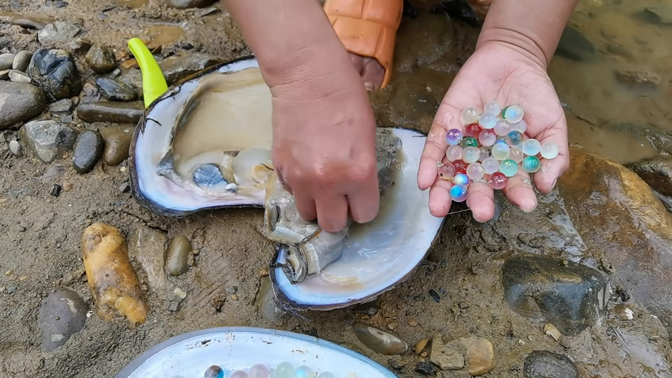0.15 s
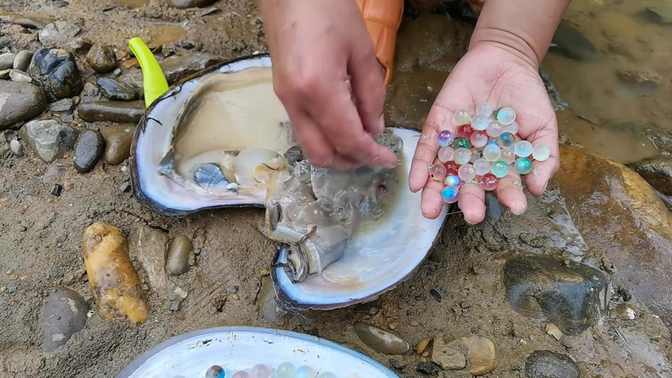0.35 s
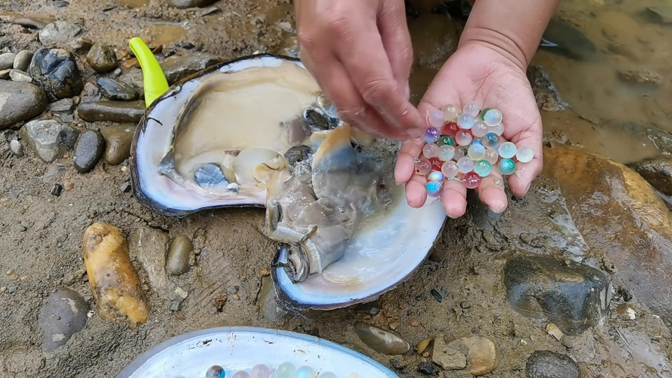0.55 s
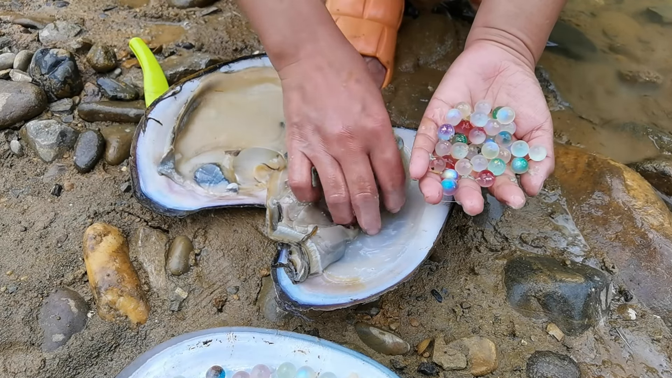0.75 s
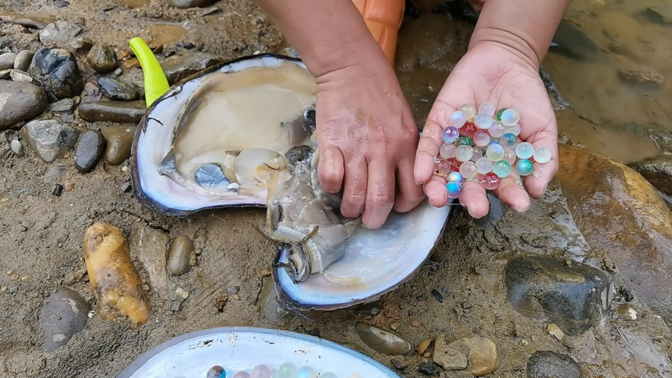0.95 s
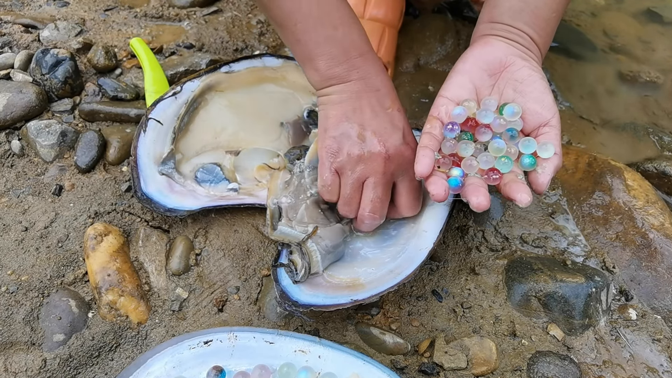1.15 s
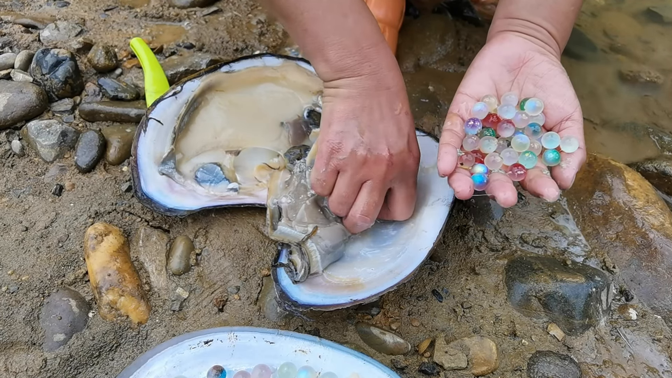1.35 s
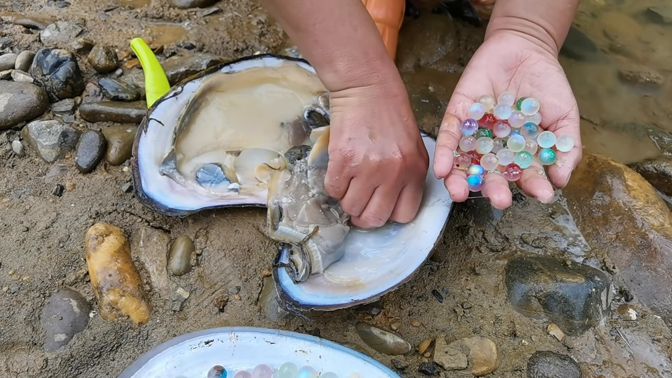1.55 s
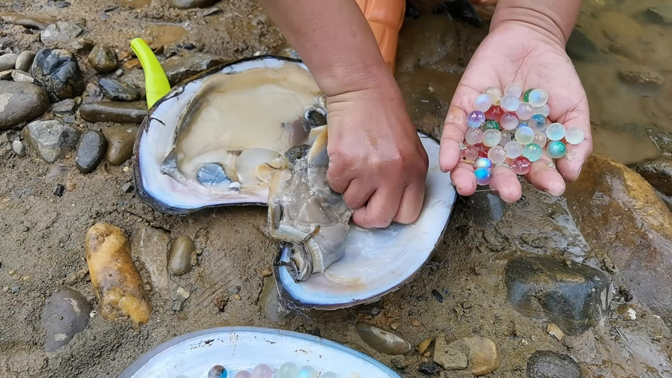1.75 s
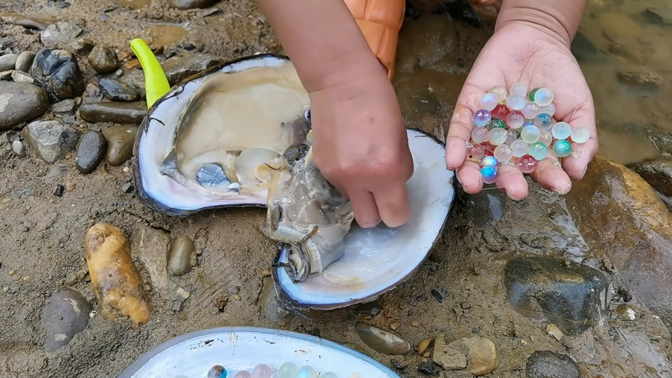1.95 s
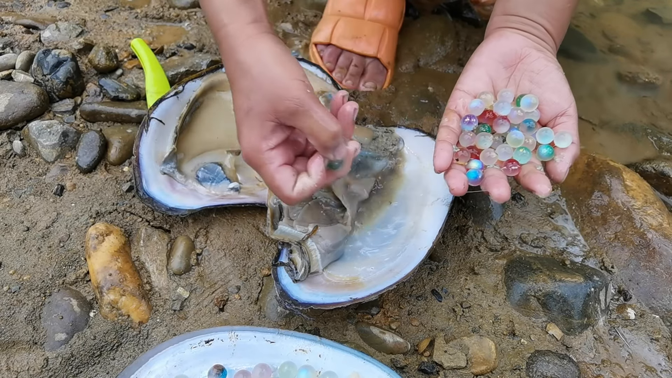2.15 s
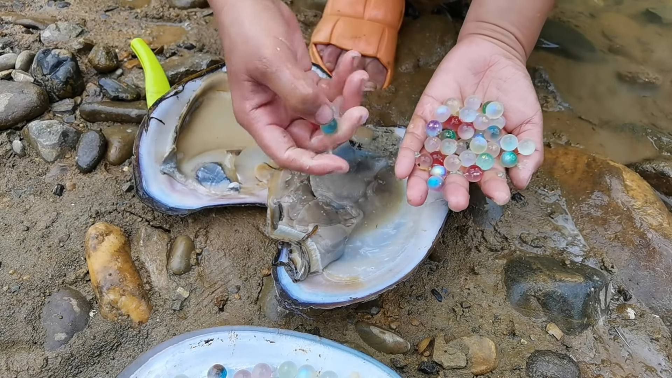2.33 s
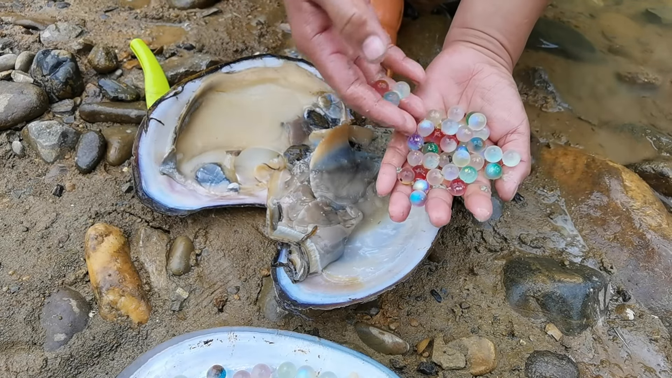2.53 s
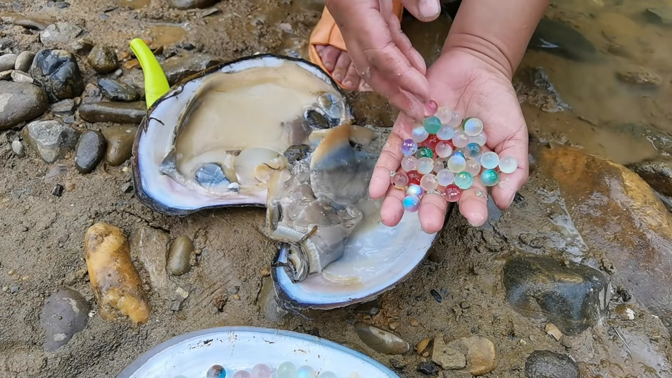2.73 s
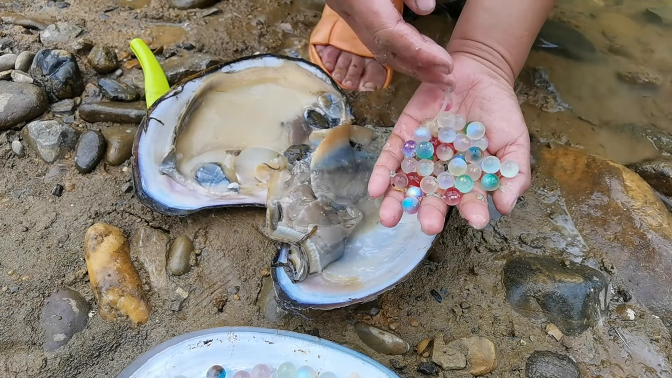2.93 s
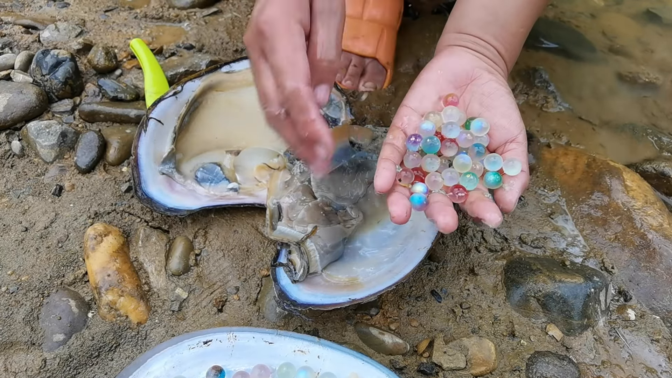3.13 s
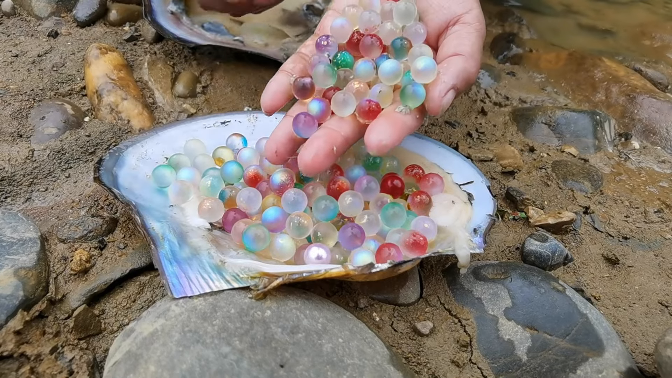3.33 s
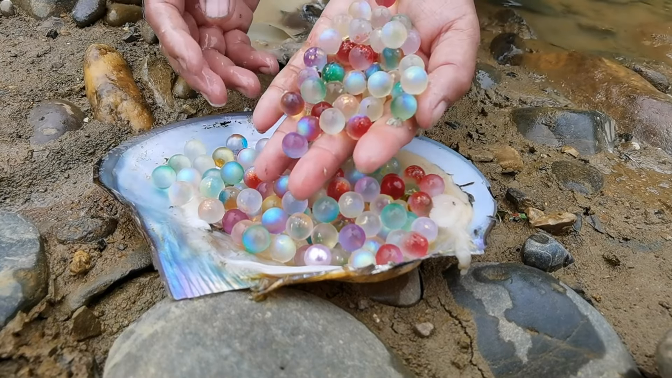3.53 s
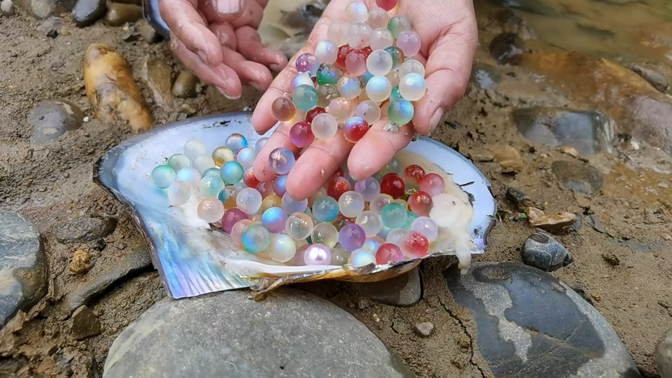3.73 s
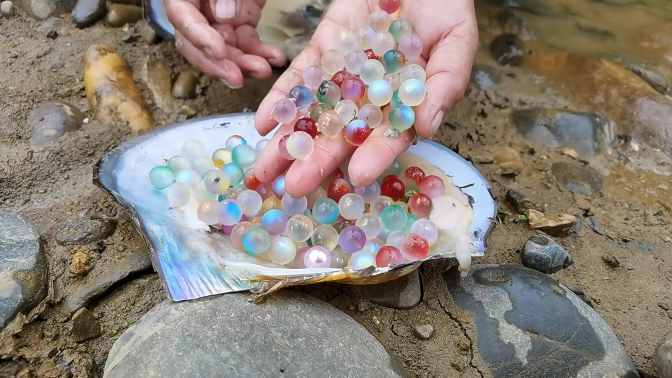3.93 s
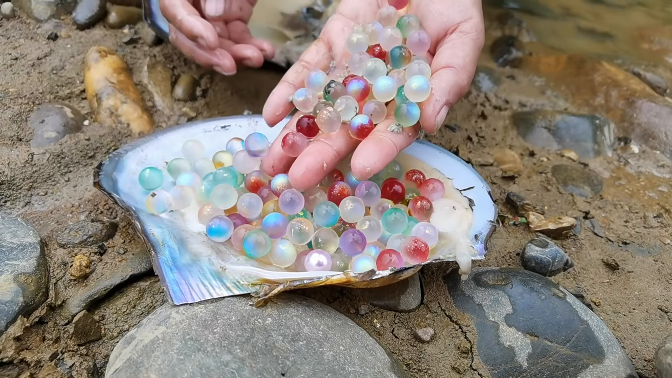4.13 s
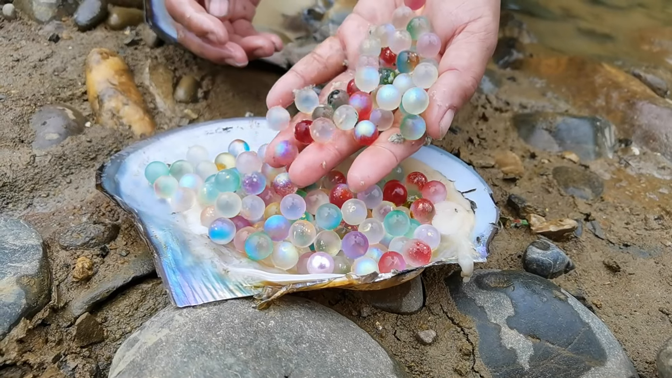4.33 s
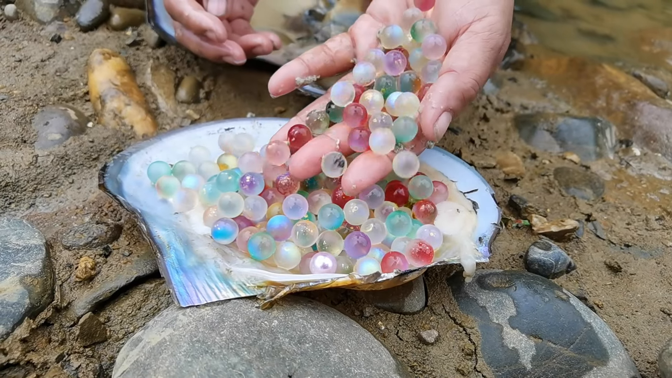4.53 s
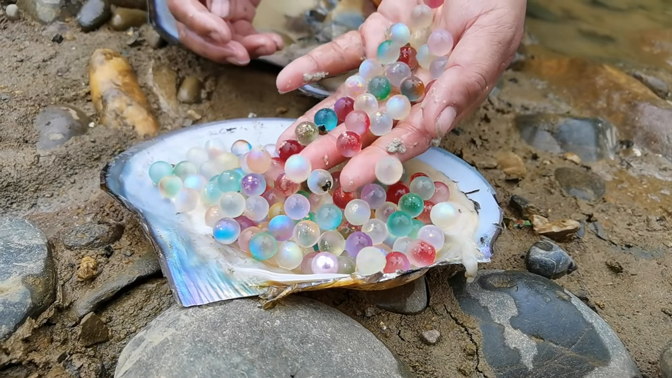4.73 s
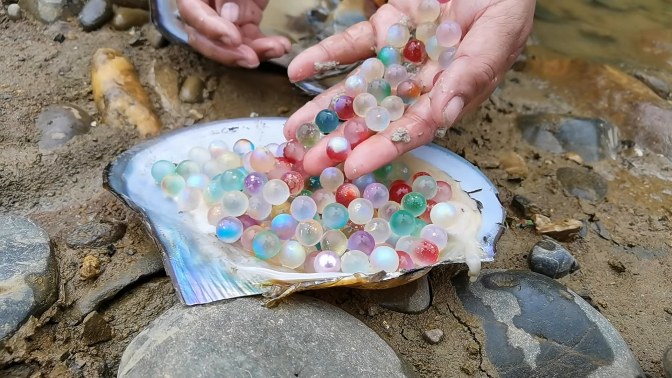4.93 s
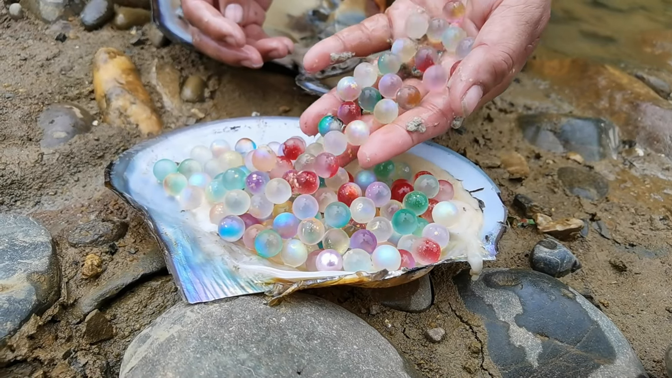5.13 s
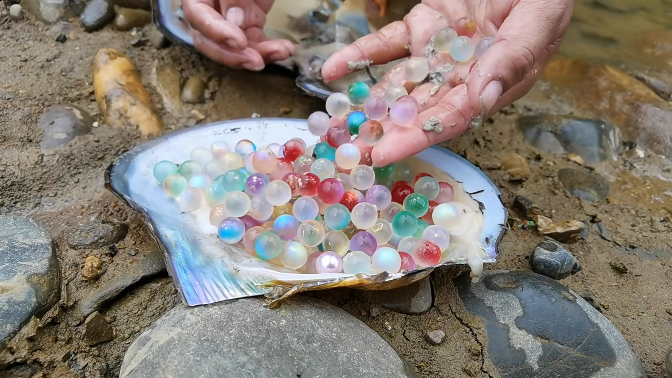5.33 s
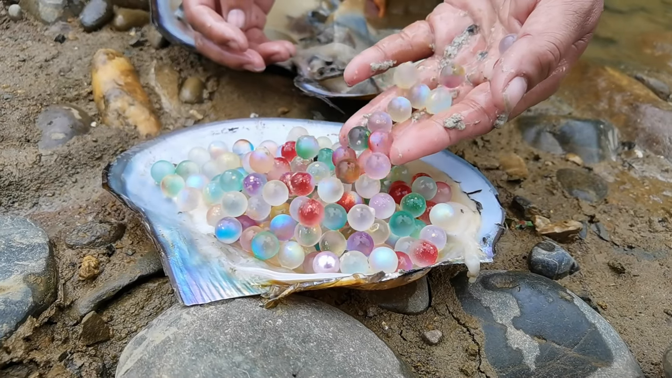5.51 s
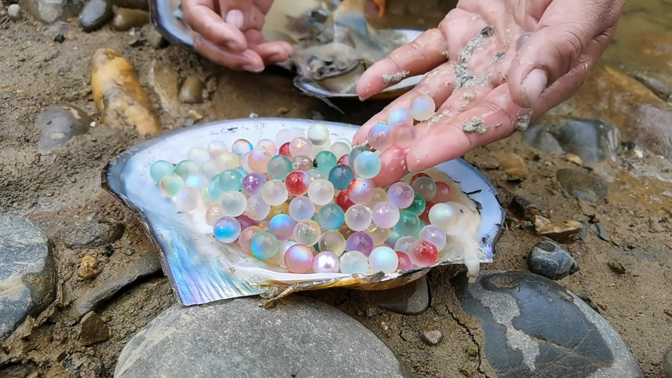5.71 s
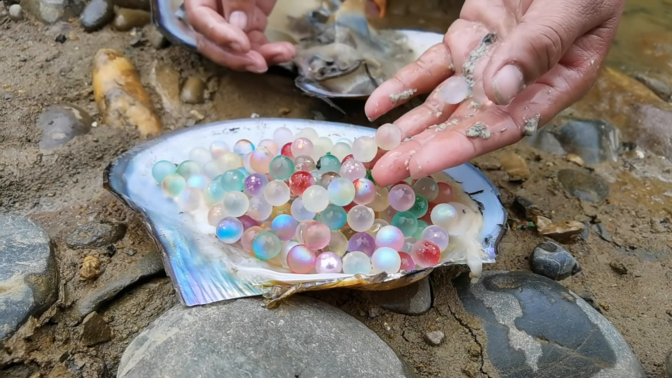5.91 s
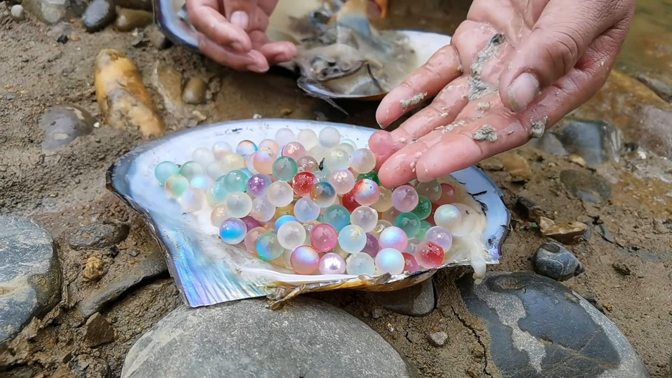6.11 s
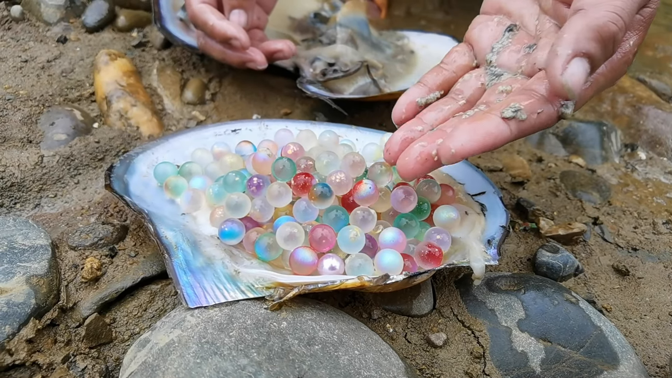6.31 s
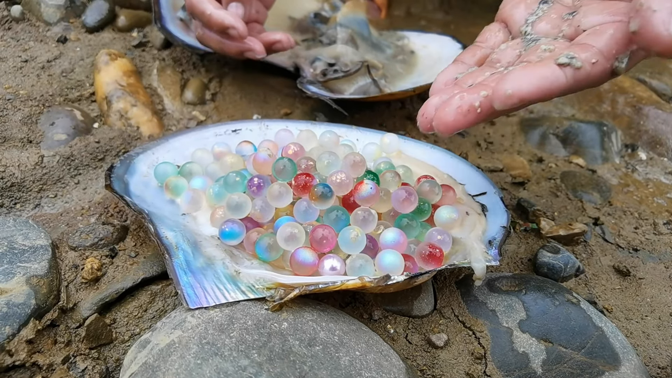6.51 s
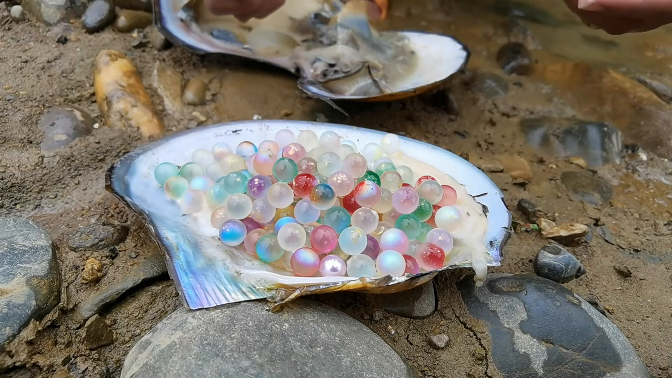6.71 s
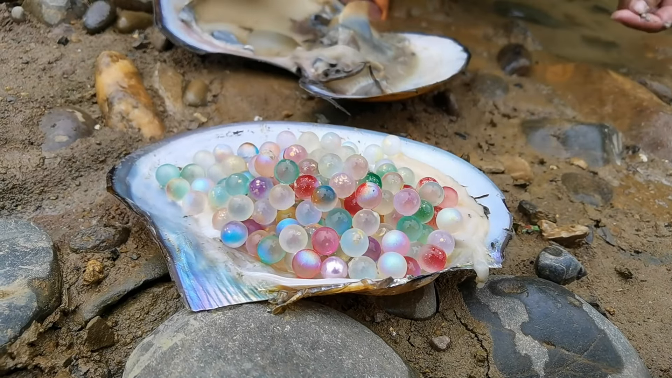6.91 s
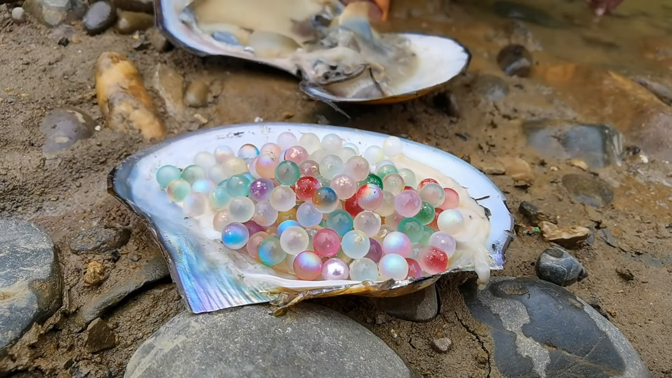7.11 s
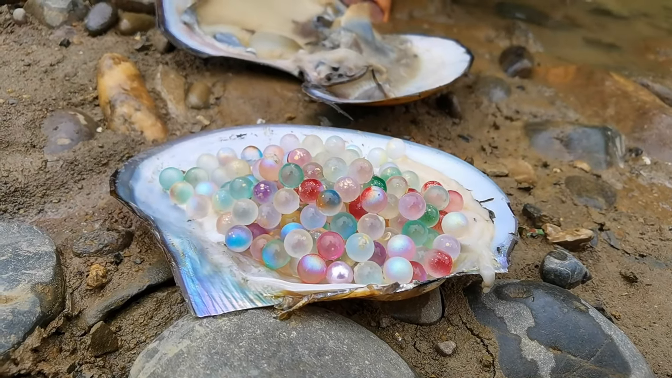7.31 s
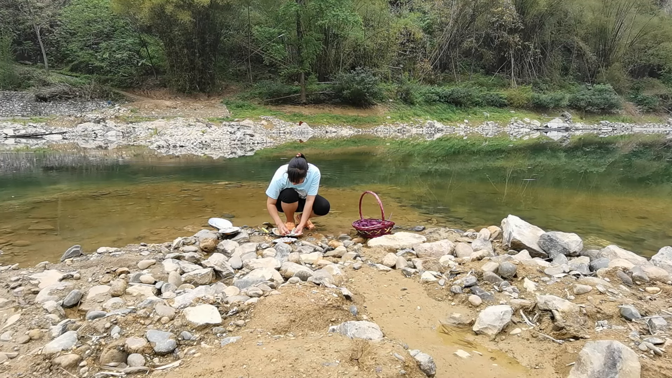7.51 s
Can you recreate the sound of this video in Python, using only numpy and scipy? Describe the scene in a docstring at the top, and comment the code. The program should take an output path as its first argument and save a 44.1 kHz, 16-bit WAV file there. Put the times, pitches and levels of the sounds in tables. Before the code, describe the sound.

Isolated bead clicks and bright little bounces, soft wet finger rubbing and distant bird whistles, then a dense close clatter of beads that thins and stops.

```python
"""On a river bank a hand digs glass beads out of a wet mussel and drops them on a handful,
then lets the handful roll off the fingers onto a heap of beads in a large shell, close by on the right.
Birds whistle in the trees across the water; the river murmurs faintly."""
import sys
import numpy as np
from scipy import signal
from scipy.fft import rfft, irfft
from scipy.io import wavfile

SR = 44100
rng = np.random.default_rng(int(sys.argv[2]) if len(sys.argv) > 2 else 0)


def inscribe(sig):
    """Save sig as 16-bit PCM at rate SR to the path in sys.argv[1].

    A 1-D sig is mono; a 2-D sig holds one channel per row.
    Samples are clipped to [-1, 1] before scaling.
    """
    pcm = np.round(np.clip(np.atleast_2d(sig).T, -1, 1) * 32767)
    wavfile.write(sys.argv[1], SR, pcm.astype(np.int16))


N = 333396

# loud bead strikes: (s, level dB, treble over middle dB)
CLICKS = [(0.124, -14, -6), (0.6437, -44, -13), (0.9026, -15, -3), (1.2918, -18, 4), (1.571, -23, -1),
          (1.9077, -27, -4), (1.9655, -16, -10), (2.2078, -24, 15), (2.2344, -22, -1), (2.272, -22, 3),
          (2.3795, -30, 3), (2.3942, -24, 17), (2.5507, -12, 15), (3.0391, -18, 9), (3.5177, -17, -4),
          (3.5921, -15, 12), (3.6771, -9, 15), (3.7284, -22, 14), (3.8332, -11, -4), (3.8673, -8, -4),
          (3.914, -8, -8), (3.9527, -7, -4), (4.0008, -11, -1), (4.0175, -9, -1), (4.0588, -11, -6),
          (4.0802, -9, -3), (4.1173, -8, 2), (4.1337, -9, -2), (4.2016, -11, -4), (4.2397, -14, -9),
          (4.3238, -12, -3), (4.4089, -11, -6), (4.4629, -11, -8), (4.4932, -8, -14), (4.5651, -8, 5),
          (4.5767, -8, -10), (4.6308, -9, 0), (4.6494, -10, -4), (4.7076, -11, 0), (4.7449, -10, -1),
          (4.7824, -11, -7), (4.8191, -13, -1), (4.8366, -8, -1), (4.9068, -10, 3), (4.9522, -17, -3),
          (5.0071, -21, -3), (5.0991, -25, 3), (5.1338, -11, -2), (5.157, -11, -6), (5.3145, -16, 0),
          (5.3701, -13, -3), (5.4143, -12, -6), (5.4578, -13, 2), (5.5032, -10, -5), (5.519, -10, -6),
          (5.638, -16, 0), (5.6668, -12, 5), (5.6906, -10, -4), (5.7216, -9, -8), (5.7753, -10, 3),
          (5.8277, -10, 0), (5.8537, -11, -7), (5.8696, -8, -9), (5.9093, -11, -1), (5.9586, -13, -4),
          (6.0365, -14, -8), (6.0895, -12, -3), (6.1443, -10, 0), (6.2105, -10, -7), (6.3019, -22, 1),
          (6.4531, -12, 7), (6.5514, -18, -5), (7.2237, -50, -8), (7.4052, -41, -21)]   # fixed
# ring of beads and shell: (Hz, width Hz, left dB, right dB)
MODES_HZ = [(1484, 72, -25.5, -3), (2552, 1290, -2, 2), (3272, 1400, -8, 11), (3805, 332, 2.5, 19.5), (5560, 340, -10.5, 8),
            (6600, 5000, -4, -37.5), (9360, 880, -32, 10), (10720, 1230, -27, 8), (12200, 10400, -15.5, -4.5)]
# heavy knocks that rock the shell on the ground: (s, level dB)
KNOCKS = [(4.134, -39), (4.708, -48), (5.519, -36), (6.211, -40), (7.412, -53)]   # fixed
# fingers rubbing in the wet flesh: (start s, length s, level dB)
RUBS = [(0.705, 0.082, -53), (0.829, 0.23, -53), (1.103, 0.15, -57), (1.219, 0.28, -52.5), (1.546, 0.082, -42), (1.658, 0.12, -46), (3.203, 0.11, -50), (3.447, 0.13, -51.5), (7.214, 0.22, -69.5)]
# background: (s, river murmur dB, high hiss dB)
AMBIENCE = [(0, -60.5, -68.5), (1.2, -60, -64), (3.1, -62, -64), (3.65, -63.5, -54), (3.8, -77.5, -68), (6.82, -82.5, -82), (6.88, -82.5, -73),
            (7.39, -73, -72), (7.43, -65, -73)]
# low rumble: (s, level dB)
RUMBLE = [(0, -76), (3.18, -79.5), (3.23, -47.5), (3.56, -53), (3.7, -75), (7.5, -84)]
# spectra: (Hz, dB per Hz)
MURMUR = [(50, -1), (130, -2.5), (215, 2.5), (300, -8.5), (650, -9.5), (1400, -20.5), (3000, -39.5)]
HISS = [(900, -11), (2300, -1), (3700, 4), (5200, -9), (10000, -8), (15000, -11.5)]
# how long neighbouring beads shiver after a strike (s)
SHIVER_S = .003   # fixed
CUTOFF_HZ = 16000   # fixed
TIME = np.arange(N) / SR
MS = SR // 1000   # fixed
VALLEY_T60_S = .6   # fixed
# on the heap a bead lands once more after each strike: usual delay (s), loss (dB)
REBOUND_S, REBOUND_LOSS_DB = .011, 11
# beads dropped on the handful bounce to rest: (s, level dB, touches, s between touches)
BOUNCES = [(0.4003, -11, 3, .034), (2.5664, -10, 3, .0062), (2.6154, -11, 2, .027), (2.7239, -13, 3, .0265), (2.8081, -22, 2, .039)]   # fixed
# loss from one touch to the next (dB); treble over middle of glass on glass (dB)
BOUNCE_LOSS_DB, GLASS_TREBLE_DB = 5.5, 15
# the pour lasts from, to (s)
POUR_S = (3.82, 6.41)   # fixed
# the handful rolls off in surges: (start s, length s, level dB)
SURGES = [(3.825, 0.33, -21), (4.193, 0.166, -26), (4.398, 0.57, -22), (5.124, 0.086, -24), (5.308, 0.86, -24)]   # fixed
# a surge builds up and dies away (s); jostling relative to its surge, and the trickle between surges (dB)
SURGE_ATTACK_S, SURGE_RELEASE_S, JOSTLE_DB, TRICKLE_DB = 0.026, 0.027, -12, -48
# a strike stirs the heap for a while (s); share of that stirring which the jostling follows
STIR_S, STIR_FOLLOWS = 0.032, 0.37
# thud under an ordinary strike of full scale (dB); it grows with the square of the force
THUD_DB = -37
# the notes of each bird call: (delay s, length s, first Hz, last Hz, level dB)
BIRD_CALLS = {"rising whistle": [(0, .21, 3930, 5200, -0.5)],
              "upward flick": [(0, 0.045, 4750, 6450, -2)],
              "high slur": [(0, .16, 6320, 5820, 0)],
              "low chirp": [(0.0095, 0.022, 2560, 2280, 0)],
              "low whistle": [(0, 0.095, 1570, 1400, -3)],
              "two-note call": [(0, 0.065, 3277, 2926, -17), (.052, .06, 3930, 3567, -1)]}
# birds calling: (s, call, level dB)
SONG = [(0.041, "rising whistle", -54.5), (.805, "high slur", -60), (1.031, "upward flick", -55.5), (1.786, "rising whistle", -59.5),
        (1.864, "low chirp", -57), (2.068, "low chirp", -62), (2.16, "low chirp", -55.5), (2.398, "two-note call", -36),
        (2.679, "low chirp", -61), (2.92, "low chirp", -58.5), (3.043, "rising whistle", -64.5), (3.135, "upward flick", -60),
        (3.365, "rising whistle", -51), (6.451, "two-note call", -52), (6.645, "upward flick", -70.5), (6.98, "low whistle", -76.5)]
# the heap falls quiet while a bead is in the air, just ahead of each strike (s)
LULL_S = .015   # fixed
# each dropped bead nudges its neighbours into a few faint ticks: within (s), loss (dB)
NUDGE_S, NUDGE_LOSS_DB = .05, 13


def from_db(db):
    """Decibels to gain."""
    return 10 ** (np.asarray(db) / 20)


def rms_one(x):
    """Scale to rms 1."""
    return x / np.sqrt(np.mean(x ** 2) + 1e-20)


def unit_energy(x):
    """Scale each stereo burst to the energy of one millisecond at rms 1."""
    return x * np.sqrt(2 * MS / np.sum(x ** 2, axis=(-2, -1), keepdims=True))


def in_time(rows):
    """The columns of a curve at every sample."""
    s, *columns = np.transpose(rows)
    return [np.interp(TIME, s, c) for c in columns]


def band(x, hz, kind, order=2):
    """Butterworth filter."""
    return signal.sosfilt(signal.butter(order, hz, kind, fs=SR, output="sos"), x)


def resonate(x, hz, width_hz):
    """A resonance with gain 1 on top."""
    r = np.exp(-np.pi * width_hz / SR)
    return signal.lfilter(np.array([1, 0, -1]) * (1 - r * r) / 2, [1, -2 * r * np.cos(2 * np.pi * hz / SR), r * r], x + 1e-18)


def add(out, s, sound):
    """Mix a sound in at time s."""
    i = max(round(s * SR), 0)
    out[..., i:i + sound.shape[-1]] += sound[..., :max(N - i, 0)]


def coloured(spectrum, left_db, alike_below_hz):
    """Stereo noise of a given spectrum, alike in both ears in the bass."""
    hz = np.fft.rfftfreq(N, 1 / SR) + 1
    points, db = np.transpose(spectrum)
    white = rfft(rng.standard_normal((3, N)))
    own = np.sqrt(hz ** 2 / (hz ** 2 + alike_below_hz ** 2))
    both = own * white[:2] + np.sqrt(1 - own ** 2) * white[2]
    return rms_one(irfft(both * from_db(np.interp(np.log(hz), np.log(points), db)), N) * from_db([[left_db], [0]]))


def shell(force, size=1, low_cut_hz=1150):
    """Contact force rings the modes, each with its own strength at either ear; small bodies radiate no bass."""
    rings = sum((-1) ** k * resonate(force, hz / size, width) * from_db([[left], [right]]) for k, (hz, width, left, right) in enumerate(MODES_HZ))
    return band(rings, low_cut_hz, "high")


def strikes(crack_s=0.00011, ring_db=-14, pitch_spread=0.081, level_db=0.22):
    """Each strike is a hard crack followed by a brief shiver of the neighbouring beads; no two ring quite alike."""
    t = np.arange(1024) / SR   # fixed
    blow = (1 - np.exp(-t / crack_s)) * (np.exp(-t / (2 * crack_s)) + from_db(ring_db) * np.exp(-t / SHIVER_S))
    hits = touches()
    force = at_both_ears((len(hits), 2, len(t))) * blow
    sizes = np.exp(pitch_spread * rng.standard_normal(len(hits)))
    rings = np.array([shell(f, size) for f, size in zip(force, sizes)])
    middle, treble = (unit_energy(band(rings, 6500, kind, order=8)) for kind in ("low", "high"))   # fixed
    out = np.zeros((2, N))
    for (s, db, bright_db), low, high in zip(hits, middle, treble):
        bright = from_db(bright_db)   # glass on glass is bright, glass on shell duller
        add(out, s, from_db(db + level_db) * (low + bright * high) / np.hypot(1, bright))
    return out


def grains(per_s, spread_db):
    """Random tiny contacts of uneven size."""
    return (rng.random(N) < per_s / SR) * rng.choice([-1, 1], N) * from_db(spread_db * rng.uniform(-1, 1, N))   # fixed


def jostle(settle_s=0.0013, busy_per_s=135):   # fixed
    """Beads of three sizes nudge each other between the louder strikes: the faster they flow, the more and harder the contacts."""
    level_curve_db = agitation()
    flow = from_db((level_curve_db - level_curve_db.max()) / 3)   # fixed
    # a bead falls freely for a moment before it lands, so a short lull comes ahead of each strike
    landings = np.append(np.array(CLICKS)[:, 0], N / SR)
    until_landing = landings[np.searchsorted(landings, TIME)] - TIME
    lull = 1 - np.exp(-(until_landing / LULL_S) ** 4)   # fixed
    out = 0
    for size in (.91, 1, 1.1):   # fixed
        contacts = grains(per_s=busy_per_s * flow, spread_db=10) * lull   # fixed
        shiver = np.sqrt(signal.lfilter([1], [1, -np.exp(-2 / (settle_s * SR))], contacts ** 2 + 1e-18))
        out = out + shell(shiver * at_both_ears((2, N)), size)
    pouring = (TIME > POUR_S[0]) & (TIME < POUR_S[1])
    return from_db(level_curve_db) * rms_one(out) * pouring


def knocks(top_hz=750, level_db=5):
    """The shell gives a dull, quickly damped thud against the mud."""
    t, out = np.arange(SR // 10) / SR, np.zeros((2, N))
    damping = np.exp(-t / .0045)   # fixed
    for s, db in KNOCKS + [(s, THUD_DB + 2 * db) for s, db, _ in CLICKS]:
        thud = band(rng.standard_normal(len(t)) * damping, top_hz, "low", order=1) * from_db([[-6], [0]])
        add(out, s, from_db(db + level_db) * unit_energy(thud))
    return out


def rubbing(uneven_db=3):
    """Wet fingers stick and slip inside the mussel: a fine, soft crackle that comes in uneven spurts."""
    pressure = np.zeros(N)
    for s, length, db in RUBS:
        add(pressure, s, from_db(db) * signal.windows.tukey(int(length * SR), .5))
    slips = grains(per_s=1400, spread_db=7) * from_db(uneven_db * flutter(35))   # fixed
    scrape = shell(slips)
    squelch = band(slips * at_both_ears((2, N)), [1100, 3200], "band") + resonate(slips, 1270, 110)   # soft flesh rings low and broad
    return pressure * (rms_one(scrape) + rms_one(squelch)) / 2


def birds(waver=0.01, tremble_db=3):
    """Slightly husky whistles that glide between two pitches."""
    out, wobble, tremble = np.zeros(N), 1 + waver * flutter(160), tremble_db * flutter(110)
    notes = [(s + delay, length, first_hz, last_hz, db + note_db)
             for s, call, db in SONG for delay, length, first_hz, last_hz, note_db in BIRD_CALLS[call]]
    for s, length, first_hz, last_hz, db in notes:
        u = np.linspace(0, 1, int(length * SR))
        now = int(s * SR) + np.arange(len(u))
        hz = (first_hz + (last_hz - first_hz) * (u + np.sin(np.pi * u / 2) ** 2) / 2) * wobble[now]
        swell = signal.windows.tukey(len(u), .3) * (.5 + u)
        add(out, s, from_db(db + tremble[now]) * swell * np.sin(2 * np.pi * np.cumsum(hz) / SR))
    return out


def valley(x, t60_s):
    """Diffuse echo from the banks and trees, different at each ear."""
    t = TIME[:SR]
    echo = rng.standard_normal((2, SR)) * from_db(-60 * t / t60_s) * (t > .015)
    return signal.fftconvolve(x, echo / np.sqrt(np.sum(echo[0] ** 2)), axes=-1)[:, :N]


def flutter(hz):
    """Random wobble of low-passed noise, with spread 1."""
    return rms_one(band(rng.standard_normal(2 * N), hz, "low")[N:])


def open_river(level_db=-66):
    """From 7.41 s a broad band of water noise is heard at once."""
    heard = TIME > 7.41   # fixed
    return from_db(level_db) * heard * rms_one(band(rng.standard_normal((2, N)), [350, 2400], "band"))


def at_both_ears(shape, alike=0.34):
    """Contact noise, partly shared by the two ears, where it arrives 0.2 ms apart."""
    noise = rng.standard_normal(shape)
    shared = np.roll(noise[..., 1, :], -9, axis=-1)   # fixed
    share = np.clip(alike, 0, 1)
    return np.stack([share * shared + np.sqrt(1 - share ** 2) * noise[..., 0, :], noise[..., 1, :]], axis=-2)


def touches():
    """Every hard contact as (s, level dB, treble dB): strikes, their rebounds on the heap, bounces and nudges on the handful."""
    chance = rng.standard_normal((len(CLICKS), 2))
    rebounds = [(s + REBOUND_S * np.exp(0.2 * late), db - REBOUND_LOSS_DB + 2 * hard, treble_db)
                for (s, db, treble_db), (late, hard) in zip(CLICKS, chance) if POUR_S[0] < s < POUR_S[1]]
    bounces = [(s + k * gap_s, db - k * BOUNCE_LOSS_DB, GLASS_TREBLE_DB) for s, db, count, gap_s in BOUNCES for k in range(count)]
    nudges = [(s + NUDGE_S * late, db - NUDGE_LOSS_DB, GLASS_TREBLE_DB) for s, db, _, _ in BOUNCES for late in rng.random(size=4)]
    return list(CLICKS) + rebounds + bounces + nudges


def agitation():
    """Level of the jostling (dB): it rises and falls with each surge, and swells after every strike."""
    surge, blows = np.zeros(N), np.zeros(N)
    for s, length, db in SURGES:
        attack = np.clip((TIME - s) / SURGE_ATTACK_S, 0, 1)
        release = np.exp(-np.maximum(TIME - s - length, 0) / SURGE_RELEASE_S)
        surge = np.maximum(surge, from_db(db + JOSTLE_DB) * attack * release)
    for s, db, _ in CLICKS:
        blows[int(s * SR)] = from_db(db) ** 2
    stir = np.sqrt(signal.lfilter([1], [1, -np.exp(-1 / (STIR_S * SR))], blows + 1e-18))
    usual = np.average(stir, weights=surge)
    return 20 * np.log10(surge * (stir / usual) ** STIR_FOLLOWS + from_db(TRICKLE_DB))


def scene():
    """Beads near by, birds far off, the river behind."""
    murmur_db, hiss_db = in_time(AMBIENCE)
    river = from_db(murmur_db) * coloured(MURMUR, left_db=-2.0, alike_below_hz=330) + open_river()
    hiss = from_db(hiss_db) * coloured(HISS, left_db=-4, alike_below_hz=340)
    rumble = from_db(in_time(RUMBLE)[0]) * rms_one(band(resonate(rng.standard_normal(N), 48, 4.4), 100, "low"))
    beads = strikes() + jostle()
    bead_echo = from_db(-22.0) * valley(resonate(beads, 3900, 2400), t60_s=0.06)
    song = birds() * from_db([[-5], [2]])
    return beads + bead_echo + knocks() + rubbing() + song + from_db(-3.5) * valley(song, t60_s=VALLEY_T60_S) + river + hiss + rumble


def record(dry):
    """The loudest peaks hit full scale; the top is cut."""
    return signal.sosfilt(signal.cheby2(16, 70, CUTOFF_HZ + 900, fs=SR, output="sos"), np.clip(dry, -1, 1))   # fixed


dry = scene()
out = record(dry)
inscribe(out)
```